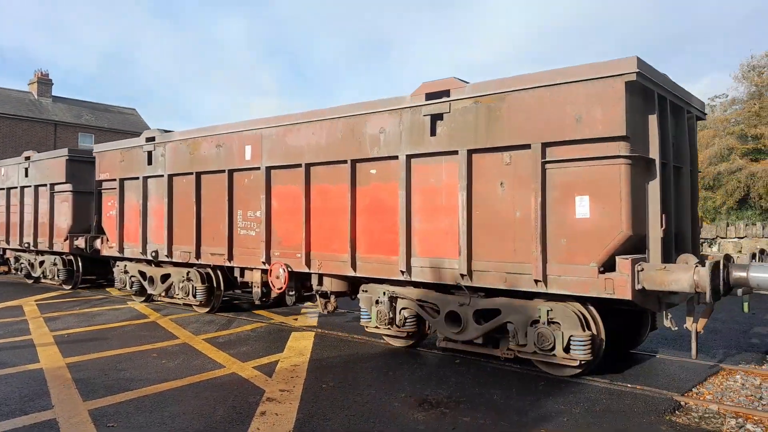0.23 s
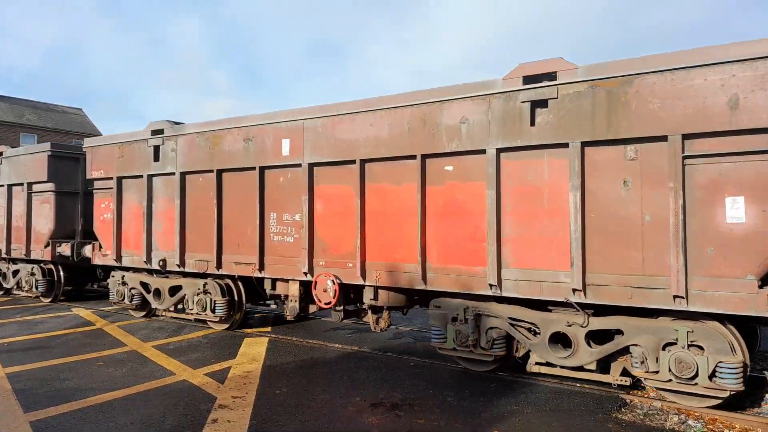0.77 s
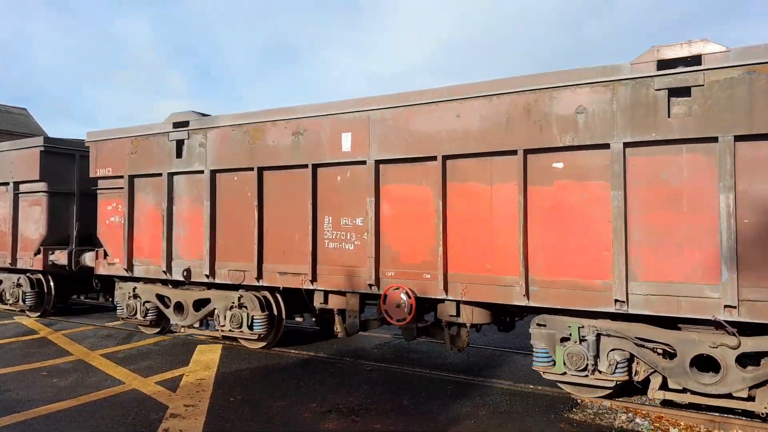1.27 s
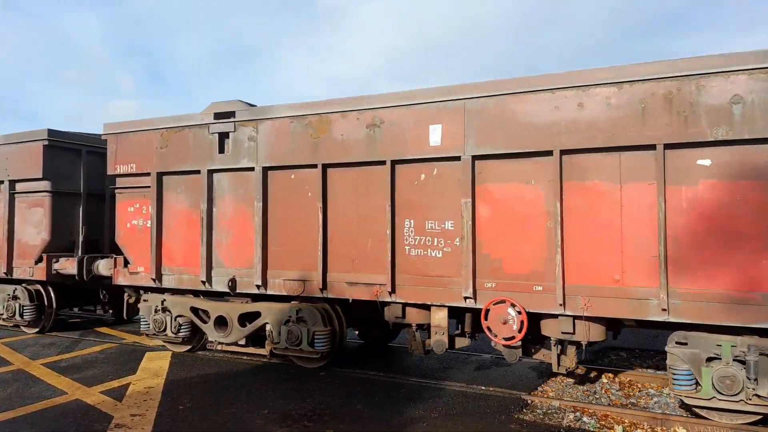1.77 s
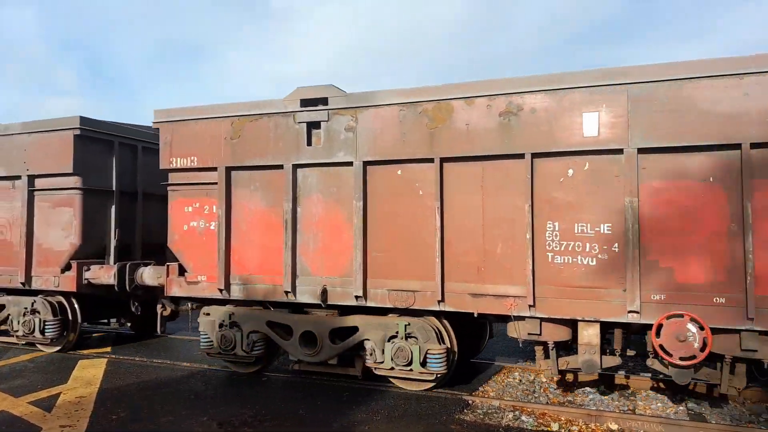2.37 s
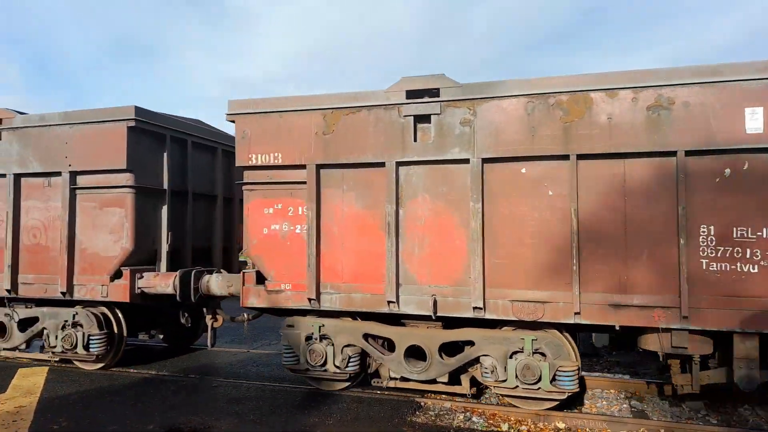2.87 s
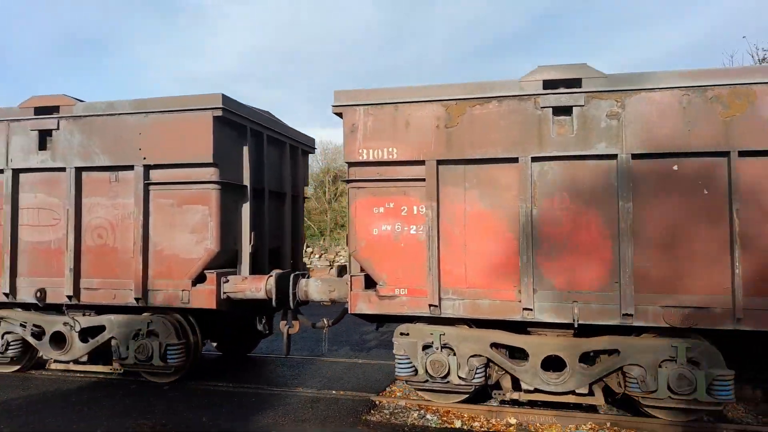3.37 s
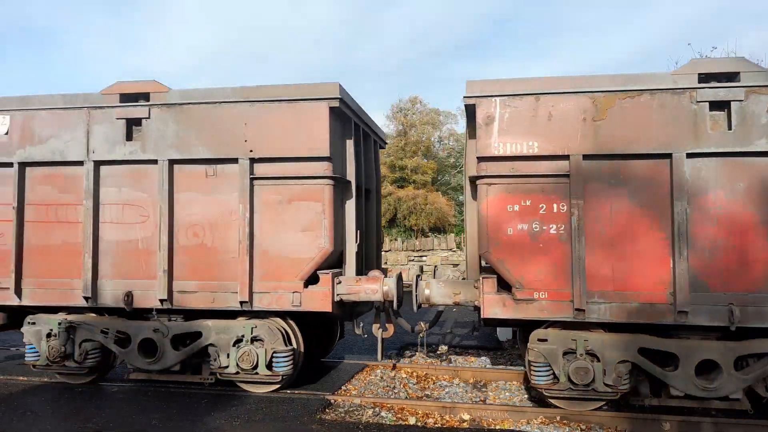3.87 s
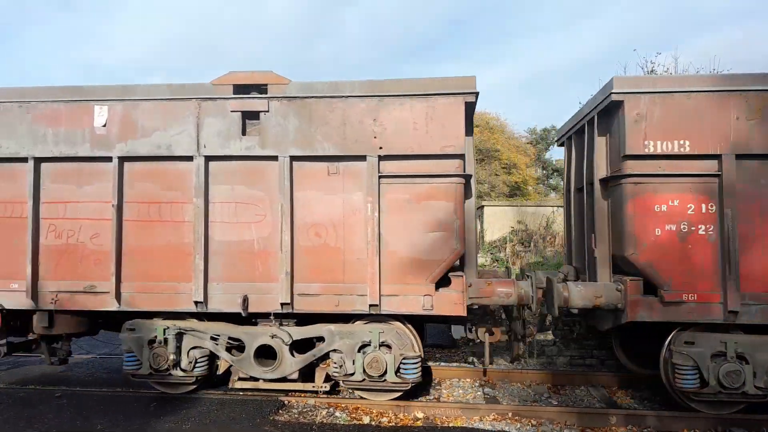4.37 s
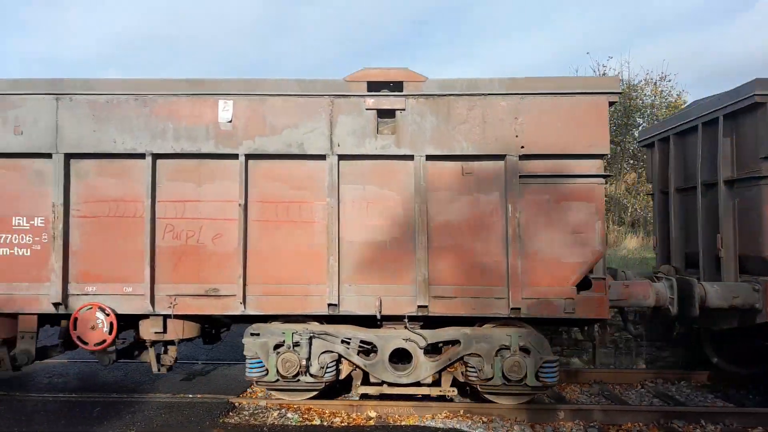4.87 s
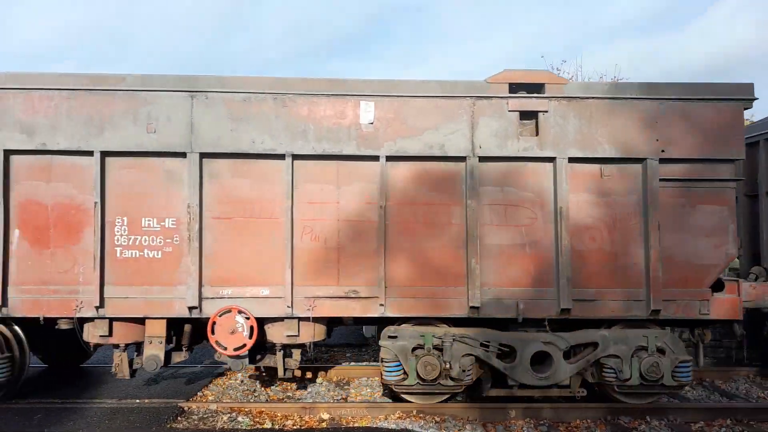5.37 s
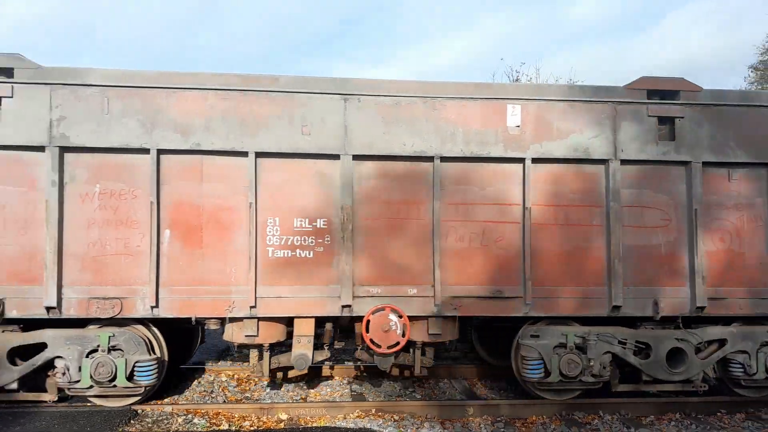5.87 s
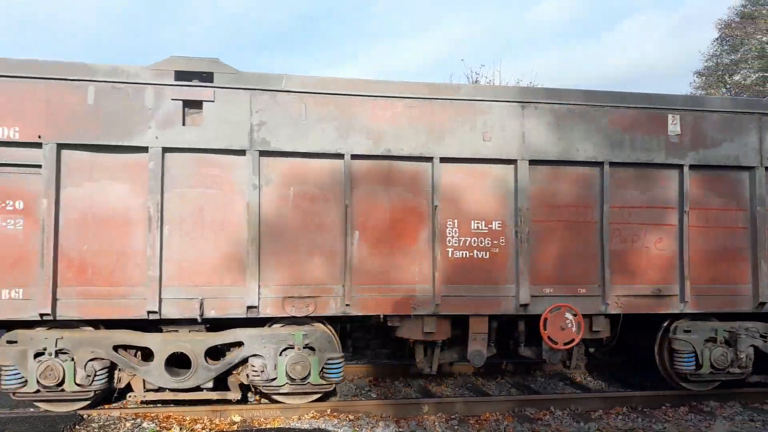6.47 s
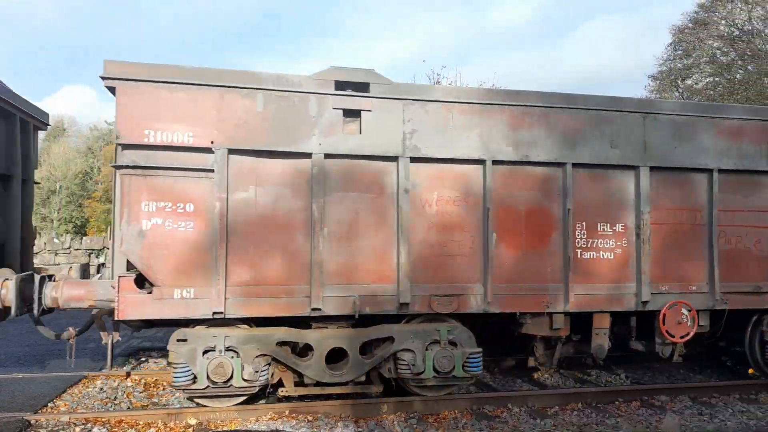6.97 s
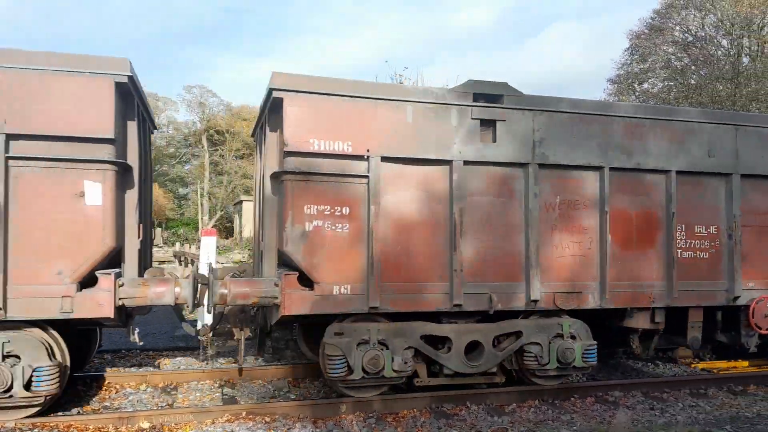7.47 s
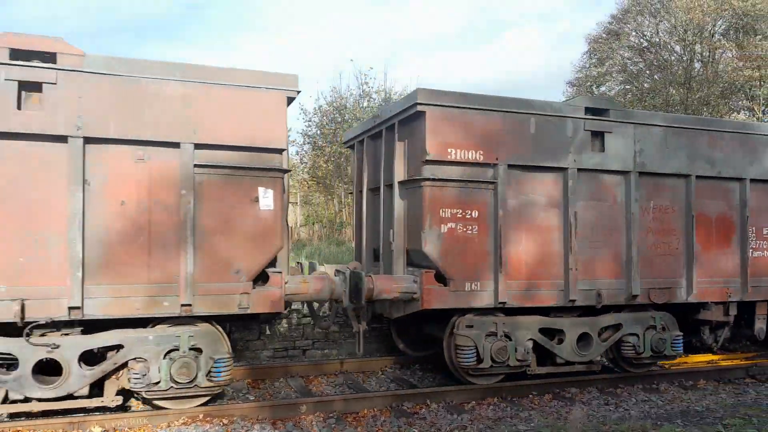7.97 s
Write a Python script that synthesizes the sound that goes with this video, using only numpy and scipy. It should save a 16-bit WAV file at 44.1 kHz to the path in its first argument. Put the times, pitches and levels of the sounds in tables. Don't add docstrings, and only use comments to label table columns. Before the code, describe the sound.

Loud pulsing diesel drone with high blower whistle and air hisses eases down and fades among rolling freight wagons, gusts popping the microphone.

```python
import sys
import numpy as np
from scipy import signal
from scipy.fft import rfft, irfft, next_fast_len
from scipy.io import wavfile
from scipy.ndimage import uniform_filter1d, map_coordinates

SR = 44100
rng = np.random.default_rng(int(sys.argv[2]) if len(sys.argv) > 2 else 0)


def transcribe(u):
    v = np.clip(np.atleast_2d(u).T, -1, 1)
    q = np.round(v * 32767).astype(np.int16)
    wavfile.write(sys.argv[1], SR, q)


def amplitude_ratio(level_db):
    exponent = np.asarray(level_db, float) / 20
    return 10 ** exponent


N = 362502


def unit(x):
    return x / np.sqrt(np.mean(x ** 2) + 1e-20)


def curves(rows):
    time_s, *columns = np.transpose(rows)
    return [np.interp(np.arange(N) / SR, time_s, column) for column in columns]


def wobble(rate_hz):
    knots = rng.standard_normal(int(N * rate_hz / SR) + 4)
    fine = np.arange(0, len(knots) - 1, 1 / 16)
    return np.interp(np.arange(N) * rate_hz / SR, fine, map_coordinates(knots, [fine]))


def noise(spectrum, patchy_db):
    z = signal.stft(rng.standard_normal(N + 1024), nperseg=512)[2]
    field = uniform_filter1d(rng.standard_normal(z.shape), size=6, axis=0)
    field = uniform_filter1d(field, size=10, axis=1)
    white = signal.istft(z * amplitude_ratio(patchy_db * unit(field)), nperseg=512)[1]
    hz, db = np.transpose(spectrum)
    m = next_fast_len(len(white))
    bins_hz = np.fft.rfftfreq(m, 1 / SR)
    colour = amplitude_ratio(np.interp(np.log(bins_hz + 1), np.log(hz), db))
    return unit(irfft(rfft(white, m) * colour, m)[:N])


def blurred(turns, blur_hz, steady=0):
    in_phase = (steady + wobble(blur_hz)) * np.cos(2 * np.pi * turns)
    quadrature = wobble(blur_hz) * np.sin(2 * np.pi * turns)
    return unit(in_phase + quadrature)


# (time [s], delay [samples])
PORT_LAG = [
    (0, 22.5),
    (6.2, 20.73),
    (6.7, 14.1),
    (8.22, 13.8),
]


def ports(x, pan_db, apart=0):
    late = map_coordinates(x, [np.arange(N) - curves(PORT_LAG)[0]], order=2, mode="nearest")
    return np.array([late * amplitude_ratio(pan_db / 2), x * amplitude_ratio(-pan_db / 2)]) + apart


def gusts(rows):
    t = np.arange(N) / SR
    breeze = amplitude_ratio(-36 - 1.5 * t + 2.5 * wobble(7))
    return breeze + sum(amplitude_ratio(db) * np.exp(-((t - s) / half_s) ** 2) for s, db, half_s in rows)


def eddy(edge_hz, chance):
    t = np.arange(len(chance)) / SR
    swing = np.sign(chance[0]) * np.cos(2 * np.pi * 0.31 * edge_hz * t) + 1.77 * chance
    lowpass = signal.butter(4, edge_hz, fs=SR, output="sos")
    pop = signal.sosfilt(lowpass, swing * np.exp(-t / 0.0011))
    return pop / np.abs(pop).max()


# (time [s], level [dB], half length [s])
LEFT_GUSTS = [(.15, -20, 0.062), (.38, -19, 0.055), (.72, -35.5, .08), (1.08, -21, 0.12),
              (1.25, -29, 0.058), (1.55, -22.5, 0.1), (1.75, -23.5, 0.048), (2.45, -41, 0.055),
              (4.5, -32.5, 0.29), (4.94, -23.5, 0.047), (5.25, -28, .04), (5.45, -33, 0.16),
              (5.92, -27, 0.12), (6.18, -29.5, 0.12), (6.59, -28, 0.058), (8.05, -35.5, 0.14)]
RIGHT_GUSTS = [(.15, -21, 0.046), (.35, -25, 0.11), (.65, -24, 0.14), (1.05, -24.5, 0.047),
               (1.3, -21.5, 0.11), (1.5, -19, 0.1), (1.8, -20, .08), (2.37, -29.5, 0.089),
               (3.25, -43, 0.036), (3.75, -34, 0.17), (4.11, -20.5, 0.11), (4.25, -30.5, 0.064),
               (5.12, -28, 0.11), (5.75, -30.5, 0.071), (6.3, -37.5, 0.34), (8.05, -38.5, 0.076)]
# (frequency [Hz], level [dB])
BUFFET_SPECTRUM = [(20, -33.5), (40, -12), (75, 5.5), (130, 0), (350, -12), (700, -25.5), (1100, -38),
                   (2500, -47.5), (5000, -82)]
# (time [s], peak [dB], sharpness [dB], port [0 left, 1 right])
POPS = [(0.161, -20, -17, 0), (0.339, -8.5, -5.5, 0), (0.345, -4.5, -4, 0), (0.386, -8, -14, 0),
        (0.401, -6.5, -16, 1), (0.654, -13, -20.5, 1), (0.682, -14, -11, 1), (1.031, -20.5, -13, 0),
        (1.075, -12, -23.5, 0), (1.119, -16, -26, 1), (1.269, -10.5, -12, 1), (1.338, -8.5, -6, 1),
        (1.387, -10, -7, 1), (1.459, -11.5, -18.5, 1), (1.479, -7, -9.5, 1), (1.599, -13, -15.5, 1),
        (1.687, -16, -14, 0), (1.777, -11, -8, 1), (1.817, -14, -20, 1), (2.522, -11, -23, 1),
        (3.705, -11, -21.5, 1), (4.03, -15, -15, 1), (4.057, -14, -17, 1), (4.124, -13, -14.5, 1),
        (4.323, -11, -16.5, 0), (4.337, -5, -14, 0), (5.253, -12, -17.5, 0), (5.288, -13, -20.5, 0),
        (5.739, -11.5, -24, 1), (6.34, -14, -12, 0)]


def wind():
    lumps = []
    for port in "LR":
        lump_db = 3.5 * wobble(28) + 4.4 * wobble(110)
        lumps.append(unit(amplitude_ratio(lump_db) * noise(BUFFET_SPECTRUM, patchy_db=0)))
    eddies_per_s = 330
    kicks = (rng.random((2, N)) < eddies_per_s / SR) * rng.laplace(size=(2, N))
    patter = signal.fftconvolve(kicks, eddy(1110, np.ones(400))[None], axes=1)[:, :N]
    gain = np.array([gusts(LEFT_GUSTS), gusts(RIGHT_GUSTS)])
    out = amplitude_ratio(3.5) * (gain * lumps + amplitude_ratio(-.5) * gain ** 1.526 * unit(patter))
    for s, db, sharp_db, port in POPS:
        start = max(round(s * SR) - 30, 0)
        edge_hz = np.clip(2700 * amplitude_ratio(0.54 * sharp_db), 400, 6000)
        pop = eddy(edge_hz, rng.standard_normal(500))
        out[round(port), start:start + len(pop)] += amplitude_ratio(db + 0.5) * pop
    return out


# (time [s], level [dB], length [s])
SPURTS = [(0, -55, .45), (.5, -60, .2), (0.72, -56, .22), (.97, -62, .1), (1.095, -56.5, 0.097),
          (1.33, -63.5, .05), (1.473, -61, 0.06), (1.634, -68.5, 0.038), (1.721, -70.5, 0.23),
          (2.185, -56.5, 0.038), (2.304, -71, .25), (2.569, -53, .1), (2.742, -61, .25), (3.006, -57, .12),
          (3.16, -58, 0.046), (3.22, -64, .12), (3.4, -73, .2)]


def spurts():
    t = np.arange(N) / SR
    rise_s, fade_s = .015, .04
    gain = np.zeros(N)
    for s, db, length_s in SPURTS:
        rise = np.clip((t - s) / rise_s + 1, 0, 1)
        gain += amplitude_ratio(db) * rise * np.exp(-np.maximum(t - s - length_s, 0) / fade_s)
    return gain


# (frequency [Hz], level [dB])
HISS_SPECTRUM = [(2000, -34), (5000, 5.5), (9500, -6), (13000, -3), (15500, -9)]


def hiss():
    air = spurts() * amplitude_ratio(1.5 * wobble(30))
    left = amplitude_ratio(-14.5) * noise(HISS_SPECTRUM, patchy_db=3.5)
    right = amplitude_ratio(4.5) * noise(HISS_SPECTRUM, patchy_db=2.0)
    return air * np.array([left, right])


# (time [s], level [dB], length [s])
SCRAPES = [(3.913, -68.5, .02), (4.204, -66, 0.027), (4.395, -67, 0.16), (5.24, -65.5, 0.072),
           (6.097, -67, 0.025), (6.164, -59.5, 0.037), (6.211, -56.5, 0.03), (6.242, -60, 0.05),
           (6.29, -60, 0.043), (6.33, -57.5, 0.055), (6.387, -58, 0.026), (6.475, -66, .02),
           (6.505, -58, 0.025), (6.535, -60, 0.029), (8.052, -67, 0.16)]
# (frequency [Hz], level [dB])
RUSTLE_SPECTRUM = [(1200, -16), (2500, -2), (4200, -3), (8500, -5), (10000, -11), (15500, -14.5)]


def brake_rub():
    t = np.arange(N) / SR
    strokes = sum(amplitude_ratio(db + 8.5) * ((t > s) & (t < s + length_s)) for s, db, length_s in SCRAPES)
    rub = uniform_filter1d(strokes, size=260) * amplitude_ratio(1.3 * wobble(90))
    left = amplitude_ratio(2.5) * noise(RUSTLE_SPECTRUM, patchy_db=1.0)
    right = amplitude_ratio(-0.3) * noise(RUSTLE_SPECTRUM, patchy_db=-2.5)
    return rub * np.array([left, right])


# (time [s], level [dB])
ROAR = [(0, -45), (.85, -49), (1.22, -50.5), (1.5, -51.5), (2.08, -56), (2.2, -51.5), (3.2, -54),
        (3.75, -59), (4.21, -56), (4.53, -55), (5.52, -56.5), (6.36, -54.5), (6.64, -54.5), (7.7, -55),
        (8.22, -52.5)]
# (time [s], nearness [1 alongside, 0 gone], gear load [dB], blower drive [dB])
NEARNESS = [
    (0, 1, 0, 0),
    (.9, 1, 0, -2),
    (1.4, .75, -5, -1),
    (2.1, .45, -2, -5),
    (2.6, .4, -1, -2),
    (3.15, .35, 5, -4),
    (3.45, .2, 3, -7),
    (3.7, 0, 0, -16),
    (8.22, 0, -2, -22),
]
# (frequency [Hz], level [dB])
MACHINERY_SPECTRUM = [(700, -28), (1100, -2.5), (2100, -3.5), (2900, -10.5), (3700, -8), (4650, -12.5),
                      (5600, -10.5), (8300, -15), (9300, -23.5), (15500, -27)]
ROLLING_SPECTRUM = [(25, -13.5), (50, 18.5), (140, 4), (200, 4), (400, -4.5), (620, -4), (900, -11.5),
                    (1300, -27), (2500, -48.5)]


def roar(turns):
    beat = 1 + 0.042 * np.sin(2 * np.pi * 9 * turns)
    machinery = amplitude_ratio(curves(ROAR)[0] + 0.78 * wobble(5)) * beat
    rolling_db = -37 + 8.5 * curves(NEARNESS)[0]
    rolling = amplitude_ratio(rolling_db + 0.99 * wobble(4.4))

    def mix(machinery_db, machinery_patchy_db, wheels_db):
        clatter = machinery * amplitude_ratio(machinery_db) * noise(MACHINERY_SPECTRUM, machinery_patchy_db)
        return clatter + rolling * amplitude_ratio(wheels_db) * noise(ROLLING_SPECTRUM, patchy_db=2.5)

    direct = mix(0, 1.4, 3.5)
    spread = np.array([mix(4.0, 2.24, 0.5) for port in "LR"])
    return ports(direct, 0.97, spread)


HIGH_REVS, LOW_REVS = 9.463, 8.207


def crank(late_s=0):
    notch_s, fall_s = .903, .155
    hunt_revs, hunt_fade_s, hunt_period_s, first_dip_s = .589, 2.55, 2.048, 1.304
    since = np.maximum(np.arange(N) / SR - late_s - notch_s, 0)
    left = (1 + since / fall_s) * np.exp(-since / fall_s)
    swing = np.cos(2 * np.pi * (since - first_dip_s) / hunt_period_s)
    hunt = hunt_revs * np.exp(-since / hunt_fade_s) * swing
    return LOW_REVS + (HIGH_REVS - LOW_REVS) * left - (1 - left) * hunt


def blades():
    lag_s, inertia_s = .08, .4
    smooth = uniform_filter1d(crank(lag_s), size=round(inertia_s * SR), mode="nearest")
    blade_hz_per_rev = 838.5 + 1.4 * np.minimum(np.arange(N) / SR, 5)
    return smooth * blade_hz_per_rev


# (share of blade frequency [ratio], near level [dB], far level [dB], blur [Hz])
GEARS = [(.0866, -55, -50, 3), (.0938, -40, -51.5, 6), (.1877, -51.5, -72, 14), (.2815, -60, -78, 10)]


def gears(rate):
    near, load_db, _ = curves(NEARNESS)
    turns = np.cumsum(blades() + 843 * rate) / (2 * SR)
    tones = np.zeros(N)
    for share, near_db, far_db, blur_hz in GEARS:
        level_db = far_db + near * (near_db - far_db)
        tones += amplitude_ratio(level_db) * blurred(share * turns, blur_hz, steady=5)
    return ports(amplitude_ratio(load_db) * tones, pan_db=3)


# (share of blade frequency [ratio], level [dB], blur [Hz])
BLOWER_DRIVE = [(.4697, -56.5, 70), (.7052, -58.5, 70)]


def blower():
    hz = blades()
    pan_db = -8.5 + 0.64 * np.arange(N) / SR
    near, _, drive_db = curves(NEARNESS)
    turns = np.cumsum(hz) / SR
    flutter = np.cumsum(70 * wobble(200)) / SR
    shaken = turns + flutter

    def whistle():
        narrow = np.sqrt(1 - 0.83 * near) * blurred(shaken, blur_hz=202)
        return narrow + np.sqrt(0.5 * near) * blurred(shaken, blur_hz=517)

    octave = amplitude_ratio(-16.5 + 1.5 * wobble(6)) * blurred(2 * shaken, blur_hz=700)
    drive = np.zeros(N)
    for share, tone_db, blur_hz in BLOWER_DRIVE:
        drive += amplitude_ratio(tone_db + drive_db) * blurred(share * turns, blur_hz, steady=1.9)
    gain = amplitude_ratio(curves(ROAR)[0] - 1.5)
    scattered = np.array([whistle() * amplitude_ratio(pan_db / 2), whistle() * amplitude_ratio(-pan_db / 2)])
    direct = ports(gain * (whistle() + octave), pan_db, gain * amplitude_ratio(2.0) * scattered)
    return direct + ports(drive, pan_db=-8.0)


# (level [dB], leaving [dB/s], fuel [dB per rev/s2])
NINTH = (-13.6, -.95, 3.4)
# (level [dB], turning to face us [dB/s], fuel [dB per rev/s2], revs [dB per rev/s], turned at [s])
FOURTEENTH = (-31.5, 1.77, 2.5, -7, 5)
# (level [dB], extra alongside [dB], revs [dB per rev/s], extra fades over [s])
OTHERS = (-27, 5, 3.5, 0.5)


def effort(rate):
    t, over = np.arange(N) / SR, rate - LOW_REVS
    burning = np.clip((t - 1.08) / .2, 0, 1)
    fuel = np.gradient(crank(late_s=.04)) * SR * burning
    db9, leave, fuel9 = NINTH
    db14, turn, fuel14, revs14, turned_s = FOURTEENTH
    db, near_db, revs, gone_s = OTHERS
    ninth_db = db9 + leave * t + fuel9 * fuel
    fourteenth_db = db14 + turn * np.minimum(t, turned_s) + fuel14 * fuel + revs14 * over
    others_db = db + near_db * np.exp(-t / gone_s) + revs * over
    return ninth_db, fourteenth_db, others_db


# (crank order [per turn], level at high revs [dB], level at low revs [dB])
ORDERS = [(4, -42.5, -60.5), (5, -50, -59), (6, -27, -43), (7, -20.5, -39.5), (8, -20, -31.5),
          (9, -14, -18), (10, -32, -25.5), (11, -30.5, -29.5), (12, -39, -48), (13, -27.5, -32.5),
          (14, -44, -23), (15, -46.5, -54.5), (16, -45, -33.5), (17, -51.5, -50), (18, -47, -43.5),
          (19, -55, -52)]


def exhaust(turns, rate):
    ninth_db, fourteenth_db, others_db = effort(rate)
    revs = np.clip(rate - 8.3, 0, 1)
    out = np.zeros(N)
    for order, high_db, low_db in ORDERS:
        k = round(order)
        if k == 9:
            db = ninth_db
        elif k == 14:
            db = fourteenth_db
        else:
            silencer_db = low_db + revs * (high_db - low_db - 8.5)
            db = others_db + 26 + silencer_db + 0.82 * wobble(2.56)
        drift = 0.14 * wobble(4)
        phase = 2 * np.pi * (k * turns + rng.random()) + drift
        out += np.sqrt(2) * amplitude_ratio(db + 1.06 * wobble(9.8)) * np.sin(phase)
    return ports(out, pan_db=1.0)


def scene():
    rate = crank()
    turns = np.cumsum(rate) / SR
    background = wind() + hiss() + brake_rub() + roar(turns)
    return background + gears(rate) + blower() + exhaust(turns, rate)


def roll_off(x):
    return signal.sosfilt(signal.butter(12, 15770, fs=SR, output="sos"), x)


def record(dry):
    highpass = signal.butter(2, 32, "highpass", fs=SR, output="sos")
    cut = signal.sosfilt(highpass, dry)
    soft = cut / (1 + np.abs(cut / .95) ** 4) ** (1 / 4)
    return roll_off(soft)


dry = scene()
out = record(dry)
transcribe(out)
```